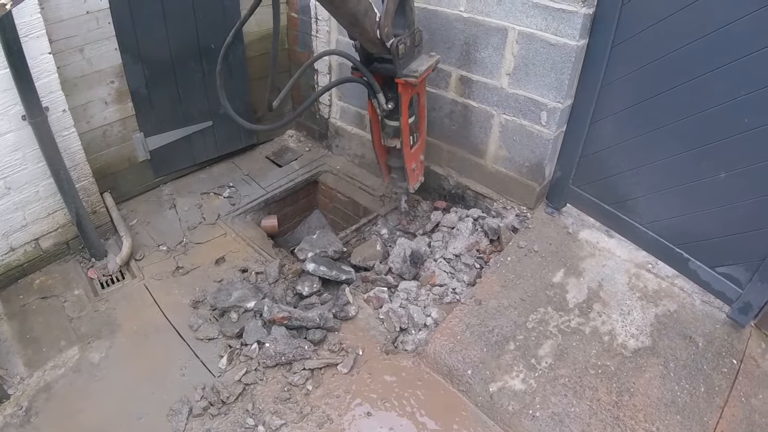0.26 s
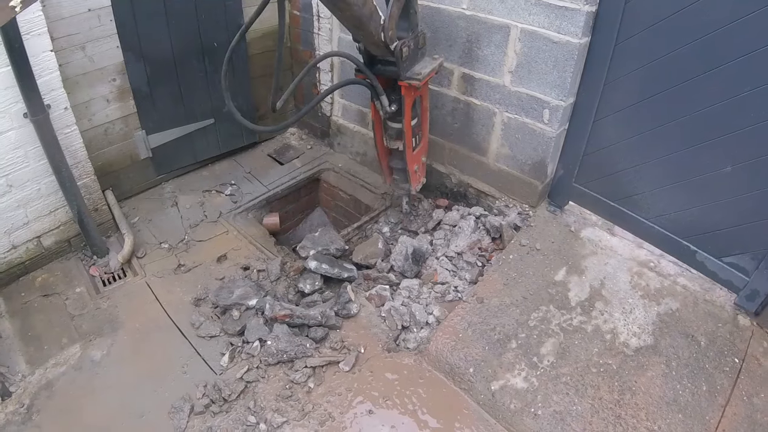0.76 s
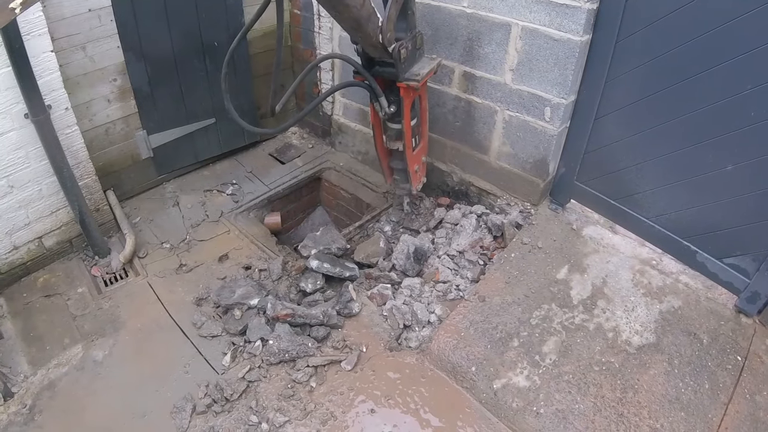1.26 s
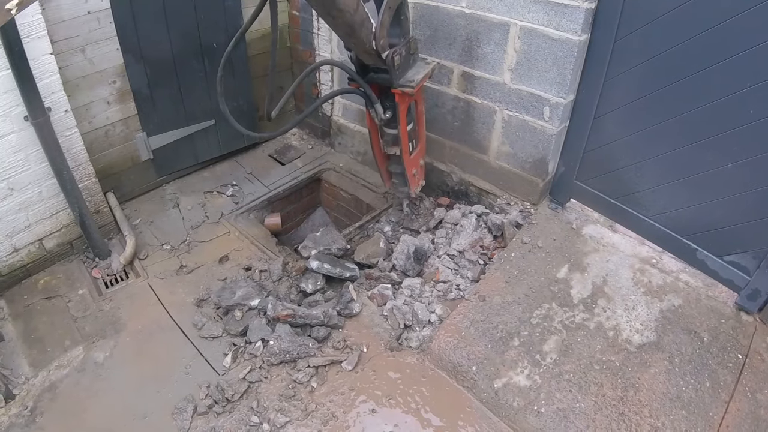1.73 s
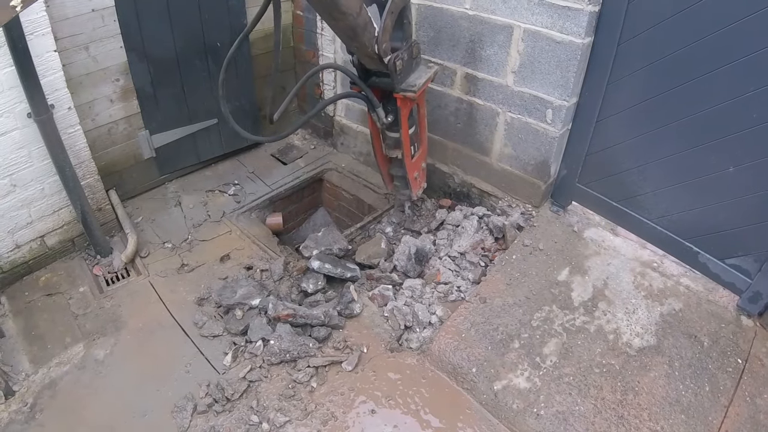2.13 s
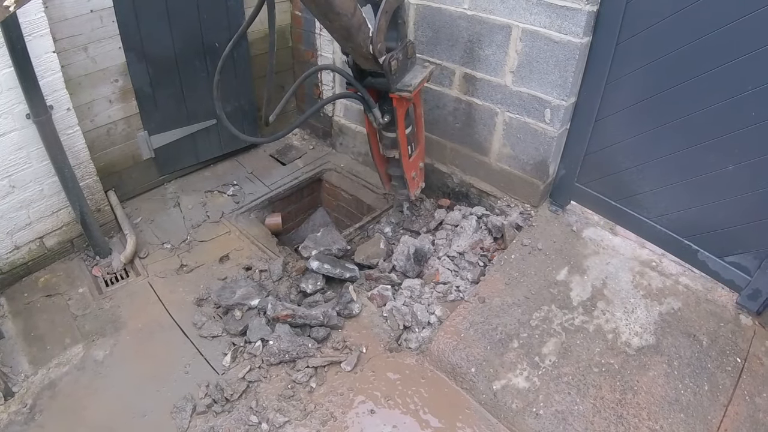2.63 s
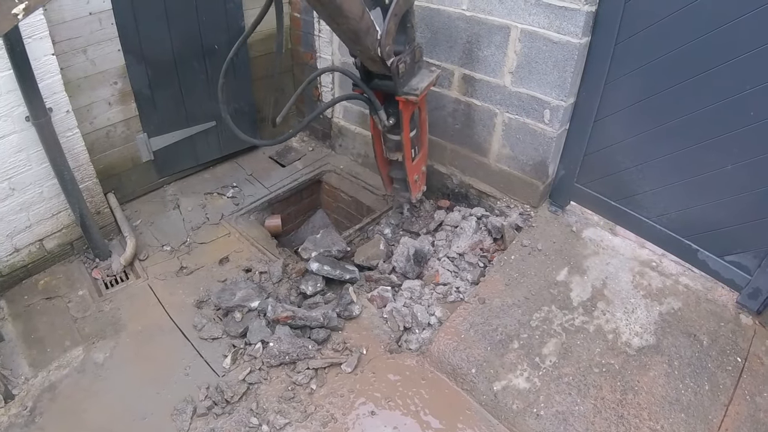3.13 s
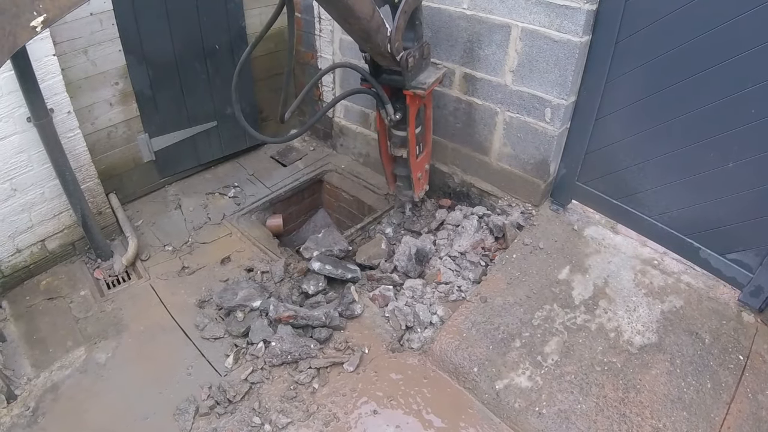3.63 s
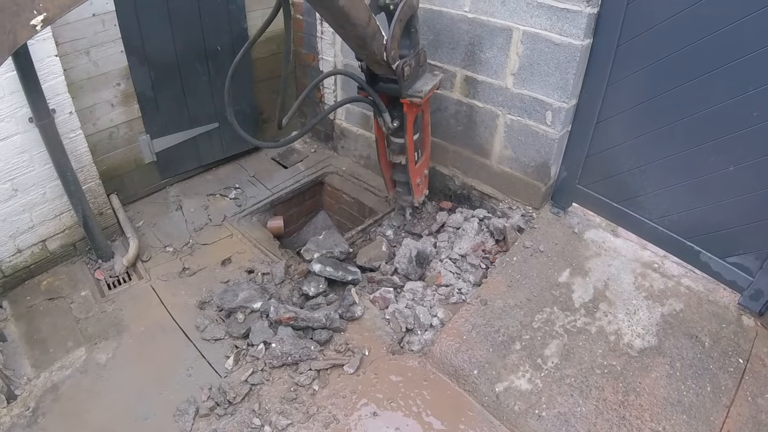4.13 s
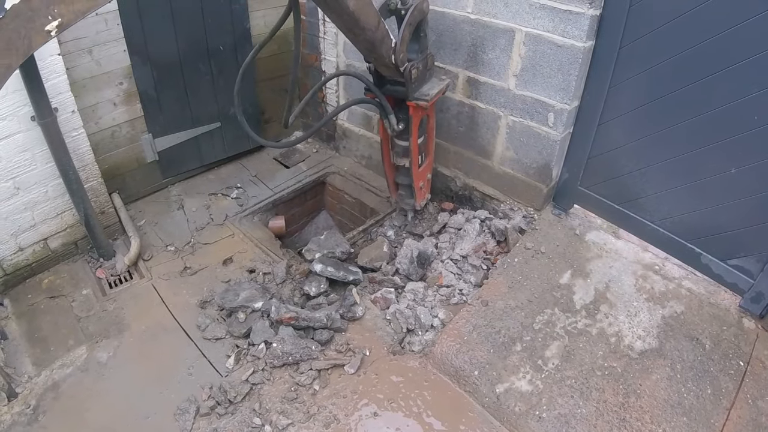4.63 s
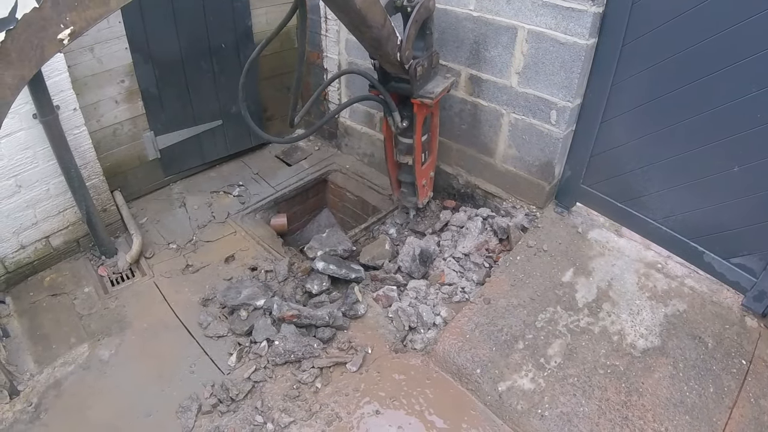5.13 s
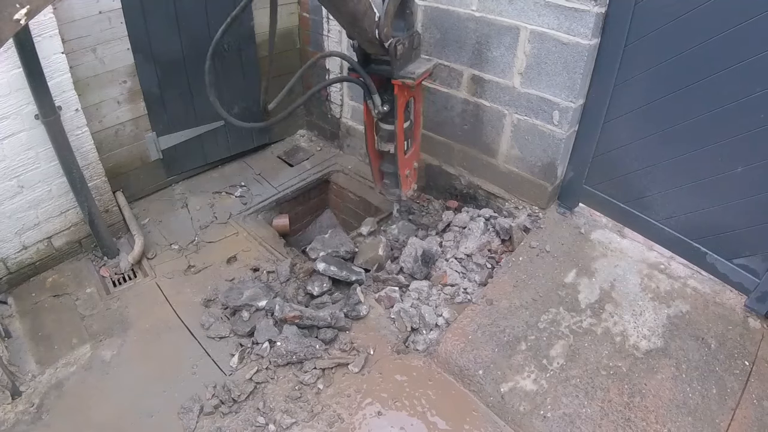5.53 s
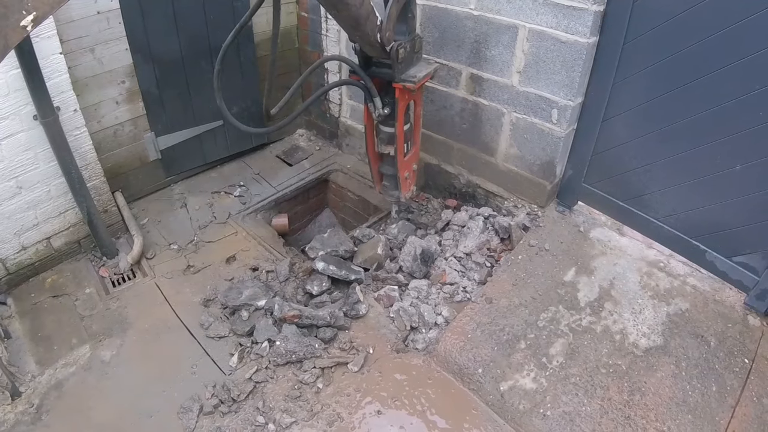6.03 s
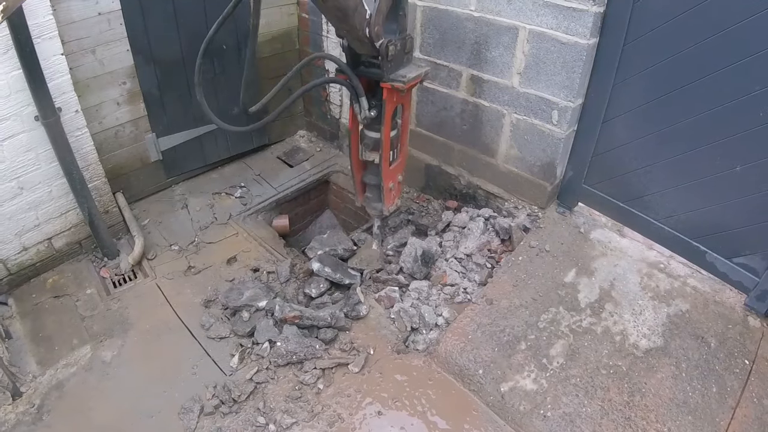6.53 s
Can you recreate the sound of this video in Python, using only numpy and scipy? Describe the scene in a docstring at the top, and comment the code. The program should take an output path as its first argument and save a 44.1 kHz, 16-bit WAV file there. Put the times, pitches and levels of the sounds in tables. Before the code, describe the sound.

A hydraulic breaker on a small digger hammers concrete in a fast stream of sharp cracks, with ringing steel and dull thuds. It falters briefly midway, resumes, then stops after about five seconds. A valve gives a faint, thin squeal, and the diesel engine comes up louder while the chisel knocks and scrapes a few times. The sound is close and bright, with short echoes from the walls of a yard.

```python
"""In a walled yard, a hydraulic breaker on a small digger hammers concrete.
Each piston blow cracks the slab, thuds in the ground and rings the steel chisel and its casing.
The digger rocks on its tracks; stray chisel blows and short scrapes add grit, clanks and low thuds.
The diesel engine runs throughout and is heard louder once the hammering stops and a valve squeals.
The walls echo the blows and scrapes, and the housing of a nearby camera colours the treble."""
import sys
import numpy as np
from scipy import signal
from scipy.fft import rfft, irfft, next_fast_len
from scipy.io import wavfile
from scipy.ndimage import uniform_filter1d, map_coordinates

SR = 44100
rng = np.random.default_rng(int(sys.argv[2]) if len(sys.argv) > 2 else 0)


def waveform_to_disk(signal):
    """Save audio, clipped to [-1, 1], as 16-bit WAV at the path in sys.argv[1]."""
    frames = np.transpose(np.atleast_2d(signal))
    scaled = np.clip(frames, -1, 1) * 32767
    samples = np.round(scaled).astype(np.int16)
    wavfile.write(sys.argv[1], SR, samples)


N = 299439


def amp(db):
    return 10 ** (np.asarray(db) / 20)


def unit(x):
    return x / np.sqrt(np.mean(x ** 2) + 1e-20)


def along(points, hz):
    """Reads a curve of (Hz, value) points on a log frequency axis."""
    f, v = np.transpose(points)
    return np.interp(np.log(hz + 1), np.log(f + 1), v)


def wobble(rate):
    """A smooth random curve through `rate` points a second."""
    return map_coordinates(rng.standard_normal(int(N * rate / SR) + 4), [np.arange(N) * rate / SR])


def filtered(x, response):
    """Scales each frequency in x by response(hz)."""
    size = next_fast_len(N + SR // 2)
    return irfft(rfft(x, size) * response(np.fft.rfftfreq(size, 1 / SR)), size)[..., :N]


def noise(colour):
    """Steady noise with the given balance of low and high."""
    return unit(filtered(rng.standard_normal(N), lambda hz: amp(along(colour, hz))))


def placed(times, rows):
    """Adds each row of samples at its start time, which may be up to a second early."""
    at = np.round((np.asarray(times) + 1) * SR).astype(int)[:, None] + np.arange(rows.shape[1])
    return np.bincount(at.ravel(), rows.ravel(), SR + N)[SR:SR + N]


def drifting(count, size, alike):
    """Random numbers, one row per blow; each row resembles the one before."""
    fresh = rng.standard_normal((count + 20, size))
    return signal.lfilter([np.sqrt(1 - alike ** 2)], [1, -alike], fresh, axis=0)[20:]


def bursts(colour, count, size, alike):
    """Noise, one row per blow: the same steel on the same spot sounds nearly the same."""
    gains = amp(along(colour, np.fft.rfftfreq(size, 1 / SR)))
    return unit(irfft(rfft(drifting(count, size, alike)) * gains, size))


def ringing(notes, count, t, scatter_db, detune, turn, attack_s):
    """Fading notes, one row per blow: level, pitch and phase drift as the contact changes."""
    rows = np.zeros((count, len(t)))
    for hz, db, fade_s in notes:
        level, pitch, phase = drifting(count, size=3, alike=0.56).T[:, :, None]
        cycles = hz * (1 + detune * pitch) * t + turn * phase
        rows += amp(db + scatter_db * level - 60 * t / fade_s) * np.sin(2 * np.pi * cycles)
    return rows * (1 - np.exp(-t / attack_s))


def snap(t):
    """The loudness of one impact: a sharp rise and a quick fade."""
    t = t.clip(0)
    return amp(-60 * t / 0.054) * (1 - np.exp(-(t / 0.00082) ** 2))


# The noise of cracking concrete, then of loose chips. Each row: frequency in Hz, relative level in dB.
CRACK_COLOUR = [(1500, -14), (3000, -5.5), (5000, 7), (8000, 1.5), (13000, 2)]
CHIP_COLOUR = [(1500, -18), (2200, -22), (2750, -19), (3600, -2), (4400, 0.5), (5200, 2), (8000, -1),
               (10000, -9), (13000, -20)]

def concrete_crack(t, db, lag_s, rattle):
    """The piston lands with a steel tick, the concrete gives way just after, and chips chatter on."""
    impact = amp(-2) * snap(t) + snap(t - lag_s + 0.00083)
    tick_db = -7 + 4.4 * rng.standard_normal(db.shape)
    tick = amp(tick_db - 60 * (t - .001).clip(0) / .006) * (t > .001)
    crack = amp(db - 8) * (impact + tick) * bursts(CRACK_COLOUR, len(db), len(t), alike=0.85)
    chips = amp(db - 9) * rattle * bursts(CHIP_COLOUR, len(db), len(t), alike=0.3)
    return crack + chips


# The noise of a clank. Each row: frequency in Hz, relative level in dB.
CLANK_COLOUR = [(400, -14), (800, -0.5), (1400, 2.5), (2200, -0.5), (3200, -1), (5000, -16.5)]
# The casing's notes. Each row: pitch in Hz, relative level in dB, seconds to fade by 60 dB.
CASING_NOTES = [(1321, -5, 0.19), (1618, -8, 0.079), (2030, -3, 0.17), (2510, 4, 0.063), (2930, -2, 0.2),
                (3437, 1, 0.22), (3760, 6.5, 0.1), (3874, 9, 0.094), (4732, 2, .1)]

def casing_clank(t, clank_db, ring_db, rattle):
    """The steel casing clanks with the blow and the rattle, then rings on."""
    count = len(clank_db)
    clank = (snap(t) + amp(3) * rattle) * bursts(CLANK_COLOUR, count, len(t), alike=.9)
    ring = ringing(CASING_NOTES, count, t, scatter_db=1.5, detune=0.0047, turn=0.22, attack_s=0.0047)
    return amp(clank_db) * clank + amp(ring_db) * ring


# The chisel's notes, main one first. Each row: pitch in Hz, relative level in dB, seconds to fade 60 dB.
CHISEL_NOTES = [(6612, 20, 0.097), (4520, -27, 0.034), (4900, -6.5, 0.064), (5100, -25, 0.034),
                (5030, -2, 0.057), (5140, 1, .08), (5350, -16, 0.033), (5770, -29, 0.043),
                (6870, -30, 0.11), (6900, 1, 0.14), (6760, -41, 0.071), (7400, -33, 0.14),
                (8150, 11, 0.082), (7730, -14, 0.074), (8590, 7, 0.072), (8750, 5, 0.088)]

def chisel_ring(t, main_db, others_db, lag_s):
    """The chisel's main note builds until the crack; rubbing on stone roughens all its notes."""
    count = len(main_db)
    others = ringing(CHISEL_NOTES[1:], count, t, scatter_db=1, detune=.01495, turn=.23, attack_s=.0018)
    main = ringing(CHISEL_NOTES[:1], count, t, scatter_db=1.4, detune=.0023, turn=.12, attack_s=.00071)
    swell = 1 - np.exp(-(t / (lag_s + 0.00017)) ** 2)
    rubbing_db = 3 * unit(uniform_filter1d(rng.standard_normal(main.shape), 90, axis=1))
    return (amp(others_db) * others + amp(main_db) * swell * main) * amp(rubbing_db)


# Notes of the slab, then the digger's arm. Each row: pitch in Hz, relative dB, seconds to fade 60 dB.
SLAB_NOTES = [(230.7, 2.5, 0.031), (284, -9.5, 0.096), (342.4, -10, 0.12), (448, -3.5, 0.03),
              (542, -8.5, 0.11)]
ARM_NOTES = [(147, 1.5, 0.14), (226, -10, 0.22), (265.6, -4, 0.21), (453.4, -8.5, 0.25), (597, -4, .06),
             (735, 3, 0.055), (868.5, -8, 0.57), (1016, -4.5, 0.14), (1191, 7.5, 0.043), (2567, -3.5, 0.11),
             (3030, 1, 0.067)]

def ground_thud(t, db, slab_db, arm_db, jolt_hz=350, jolt_s=0.0011):
    """The slab jolts down and up, then it and the digger's arm ring."""
    jolt = np.sin(2 * np.pi * jolt_hz * (t - .0022)) * np.exp(-((t - .0024) / jolt_s) ** 2)
    slab = ringing(SLAB_NOTES, len(db), t, scatter_db=2, detune=0.031, turn=0.11, attack_s=0.005)
    arm = ringing(ARM_NOTES, len(db), t, scatter_db=1, detune=.004, turn=.03, attack_s=.001)
    return amp(db) * (jolt + amp(slab_db) * slab + amp(arm_db) * arm)


# The piston's blows. Each row: start in seconds, strength in dB.
PISTON_BLOWS = [(-.0085, -13.5), (0.0365, -12), (0.0816, -12), (.128, -12.5), (0.1741, -11.5),
                (0.2184, -11.5), (0.2634, -12.5), (.308, -13), (.3534, -12.5), (0.398, -12),
                (0.4424, -12.5), (.487, -11), (0.5314, -13), (0.5759, -11.5), (0.622, -11), (0.666, -11.5),
                (0.7105, -12.5), (0.756, -12.5), (0.8013, -12), (0.8456, -10.5), (0.8903, -11),
                (.9367, -12.5), (0.987, -8.5), (1.0398, -7.5), (1.0931, -8.5), (1.146, -7.5), (1.203, -8),
                (1.2614, -8), (1.3186, -7.5), (1.3752, -8), (1.4329, -7.5), (1.491, -9.5), (1.548, -9.5),
                (1.5987, -10.5), (1.6466, -11.5), (1.6946, -11), (1.7433, -10.5), (1.797, -8.5),
                (1.861, -8.5), (1.9288, -9.5), (1.988, -12.5), (2.0429, -11), (2.097, -11), (2.1487, -9.5),
                (2.2004, -8.5), (2.255, -8), (2.3144, -9), (2.3719, -8.5), (2.4271, -7.5), (2.4846, -9),
                (2.5445, -8), (2.607, -10), (2.6704, -11.5), (2.7345, -13.5), (2.7975, -15),
                (2.8604, -15.5), (2.9245, -18.5), (2.9989, -30), (3.0738, -15), (3.1419, -23.5),
                (3.2081, -14), (3.2902, -11.5), (3.3616, -9), (3.423, -9), (3.4808, -9.5), (3.5361, -11.5),
                (3.6005, -13), (3.6656, -9.5), (3.7215, -8), (3.7732, -10), (3.821, -8), (3.8693, -12.5),
                (3.9185, -12), (3.9669, -11.5), (4.02, -9), (4.0811, -7.5), (4.1422, -7.5), (4.1971, -6.5),
                (4.2464, -8), (4.2967, -6.5), (4.3466, -7), (4.3956, -8), (4.448, -12.5), (4.5052, -10.5),
                (4.5633, -9), (4.6174, -9), (4.6679, -9), (4.7158, -8.5), (4.7643, -8), (4.813, -8),
                (4.863, -7.5), (4.918, -7.5), (4.977, -10.5), (5.0737, -24.5), (5.2207, -26.5),
                (5.2701, -44)]
# How the chisel sits in the slab. Each row: time in seconds, looseness from 0 (tight) to 1 (loose),
# then relative levels in dB for the ground thud, casing clank, chisel ring and casing ring.
CHISEL_SEATING = [(0, 0.86, -17.5, -29, -39, -12), (.56, 0.84, -17, -28, -42, -15),
                  (.75, 0.97, -20.5, -29.5, -24, 3), (.93, 0.62, -14.5, -30, -37, 4.5),
                  (1.0, 0.13, -17, -28.5, -24, -2), (1.45, 0.22, -14.5, -29, -37, 0.5),
                  (1.65, 0.15, -16, -26, -17.5, -3.5), (1.862, 0.04, -18, -27, -33, -1.5),
                  (2.15, 0.06, -18, -25.5, -19, -4), (2.48, 0.32, -14.5, -29.5, -38, 1.5),
                  (2.62, 0.16, -17.5, -31, -14.5, -4), (2.95, 0.69, -21, -31, -10, -1),
                  (3.148, 0.27, -20, -26, -17, 5), (3.3, 0.2, -13, -26, -23, -7),
                  (3.9, 0.46, -11, -27, -31, -0.5), (4.08, 0.23, -16.5, -26.5, -30, -3.5),
                  (4.5, 0.23, -16, -26.5, -29.5, -8), (4.87, 0.3, -21, -30.5, -22, -6.5),
                  (5.3, 0.25, -42, -41, -39, 8.5)]

def breaker(usual_blow_db=-11):
    """A piston hits the chisel; the force and the chisel's seating shape each blow."""
    starts, db = np.transpose(PISTON_BLOWS)[:, :, None]
    times, *columns = np.transpose(CHISEL_SEATING)
    loose, thud_db, clank_db, chisel_db, casing_db = (np.interp(starts, times, c) for c in columns)

    def tight_to_loose(tight_value, loose_value):
        return np.interp(loose, [0, 1], [tight_value, loose_value])

    t = np.arange(4608) / SR
    force_db = db - usual_blow_db
    # the wait between the piston landing and the concrete giving way
    lag_s = tight_to_loose(0.0047, 0.00063) * np.exp(0.31 * rng.standard_normal(starts.shape))
    # a loose chisel rattles louder and longer
    rattle_db, rattle_s = tight_to_loose(-8.5, 2), tight_to_loose(.12, .17)
    rattle = amp(rattle_db - 60 * t / rattle_s) * (1 - np.exp(-t / 0.0039))
    crack = concrete_crack(t, db, lag_s, rattle)
    casing = casing_clank(t, clank_db + 0.23 * force_db, casing_db + force_db - 36, rattle)
    chisel = chisel_ring(t, chisel_db + force_db - 25, db - 23.5, lag_s)
    thud = ground_thud(t, thud_db + 0.13 * force_db - 2.5,
                       slab_db=tight_to_loose(-5.5, -3), arm_db=tight_to_loose(-38.5, -5))
    fade_out = 1 - (t / t[-1]) ** 8
    return placed(starts[:, 0] - .001, (crack + casing + chisel + thud) * fade_out)


# The engine as it is heard, louder once the hammering stops.
# Each row: time in seconds, firings a second, exhaust level in dB, hum level in dB.
ENGINE_AS_HEARD = [(0, 55.8, -40, -50), (.8, 56.7, -39.5, -42), (1.1, 56.4, -42, -43),
                   (2.5, 56.8, -42.5, -46), (3.05, 55.5, -42, -39.5), (3.3, 57, -40.5, -41.5),
                   (4, 56.5, -40, -39.5), (4.6, 56.75, -43, -42), (5.05, 56, -44.5, -42.5),
                   (5.3, 55.2, -39, -36), (5.46, 54.64, -35.5, -35), (5.6, 59.75, -37.5, -37),
                   (5.901, 57.4, -35, -32), (6.33, 58, -32.5, -30), (6.6, 58.04, -30, -29),
                   (6.79, 57.7, -32.5, -30)]
# The hum of engine and pump. Each row: multiple of the firing rate, relative level in dB.
HUM_TONES = [(1, -2.5), (2, -2.5), (2.93, -10.5), (3.55, -21), (4, -3), (4.58, -7), (5, -19.5), (6.33, -19),
             (8, -22)]
# The noise of the exhaust, then of the valves. Each row: frequency in Hz, relative level in dB.
EXHAUST_COLOUR = [(20, -16), (36, -11), (60, -19), (85, -15), (140, -4), (230, 1.5), (400, -7), (800, -9),
                  (1500, -15.5), (3000, -24), (6000, -103)]
CLATTER_COLOUR = [(300, 3), (700, 0.5), (1500, 1.5), (3000, -8.5), (6000, -4), (9500, -11), (13000, -60)]

def diesel_engine():
    """The firings make a hum and put a beat into the exhaust roar and the valve clatter."""
    times, *columns = np.transpose(ENGINE_AS_HEARD)
    t = np.arange(N) / SR
    firing_hz, exhaust_db, hum_db = (np.interp(t, times, c) for c in columns)
    firings = np.cumsum(firing_hz) / SR
    hum = np.zeros(N)
    for multiple, db in HUM_TONES:
        level = amp(db + 0.61 * multiple * wobble(8.7))
        cycles = multiple * (firings + 0.0096 * wobble(12)) + rng.random()
        hum += level * np.sin(2 * np.pi * cycles)
    uneven = np.where(firings % 2 < 1, 1, .7)  # the cylinders differ
    beat = uneven * np.exp(-(firings % 1) / 0.33)
    roar = unit((1.8 + beat) * noise(EXHAUST_COLOUR)) * amp(exhaust_db + 0.9 * wobble(8))
    clatter_db = -47 + 0.67 * (exhaust_db + 40)  # follows the exhaust level
    clatter = unit((4.7 + beat) * noise(CLATTER_COLOUR)) * amp(clatter_db + 0.4 * wobble(5))
    return amp(hum_db) * hum + roar + clatter


# The digger's thumps. Each row: start in seconds, level in dB.
TRACK_THUMPS = [(.85, -33), (.9, -36), (2.33, -43), (3.19, -36), (4.82, -43)]

def digger_rocking(hz=42, rise_s=.008, fade_s=.2):
    """The digger rocks on its tracks with low, soft thumps."""
    starts, db = np.transpose(TRACK_THUMPS)[:, :, None]
    t = np.arange(SR // 4) / SR
    shape = amp(db - 60 * t / fade_s) * (1 - np.exp(-t / rise_s))
    return placed(starts[:, 0], shape * np.sin(2 * np.pi * hz * t))


# Stray chisel blows and short scrapes. Each row: start in seconds, level in dB, dB added for its clank.
STRAY_BLOWS_AND_SCRAPES = [(3.171, -13, -14), (3.2174, -4, -18), (3.296, -9, -14), (5.362, -25, -9),
                           (5.378, -21.5, -13.5), (5.4017, -20.5, -12), (5.456, -18, -9),
                           (5.479, -8.5, -11), (5.708, -29, -8), (5.934, -17, -13.5), (6.3205, -24, -18),
                           (6.57, -26, -10), (6.607, -26.5, 0), (6.649, -11, -6), (6.6704, -17, -9),
                           (6.6877, -8, -15), (6.707, -14, -7.5)]
# Their low thud. Each row: frequency in Hz, relative level in dB.
THUD_COLOUR = [(40, -14), (90, -13), (150, 2), (260, -3), (500, -0.5), (900, -16), (2000, -48)]

def stray_blows_and_scrapes(rise_s=0.006, fade_s=0.017, grit_db=-12.5, thud_db=-16):
    """The chisel strikes or scrapes briefly, each time with grit, a clank and a low thud."""
    starts, db, clank_db = np.transpose(STRAY_BLOWS_AND_SCRAPES)[:, :, None]
    t = np.arange(SR // 8) / SR
    shape = amp(db) * (1 - np.exp(-t / rise_s)) * np.exp(-t / fade_s)
    layers = [(grit_db, CHIP_COLOUR), (clank_db, CLANK_COLOUR), (thud_db, THUD_COLOUR)]
    roughness = amp(1.93 * wobble(300))
    return roughness * sum(placed(starts[:, 0] - .002, amp(layer_db) * shape) * noise(colour)
                           for layer_db, colour in layers)


# The valve's whistle. Each row: time in seconds, pitch in Hz, level in dB.
VALVE_WHISTLE = [(5.07, 2900, -72), (5.11, 2930, -51), (5.21, 3150, -58), (5.251, 3250, -72)]

def valve_squeal():
    """Pressure bleeds off through a valve: a thin rising whistle with its octave."""
    times, hz, db = np.transpose(VALVE_WHISTLE)
    t = np.arange(N) / SR
    phase = 2 * np.pi * np.cumsum(np.interp(t, times, hz) + 8 * wobble(60)) / SR
    level = amp(np.interp(t, times, db, left=-120, right=-120) + 2 * wobble(40))
    return level * (np.sin(phase) + .6 * np.sin(2 * phase))


# Echoes off the walls. Each row: delay in seconds, level in dB.
WALL_ECHOES = [(.008, -23), (.013, -22.5), (.019, -22), (0.029, -27)]

def yard(x, tail_db=-14.5, tail_s=0.04):
    """Near walls send back a few echoes and a short, blurred tail."""
    t = np.arange(SR // 4) / SR
    tail = amp(-60 * t / tail_s) * rng.standard_normal(len(t))
    response = amp(tail_db) * unit(tail) / np.sqrt(len(t))
    response[0] = 1  # the direct sound
    for delay_s, db in WALL_ECHOES:
        response[round(delay_s * SR)] += amp(db)
    return signal.fftconvolve(x, response)[:N]


def scene():
    """All the sounds in one channel; only the blows and scrapes echo."""
    hammering = yard(breaker() + stray_blows_and_scrapes())
    return (hammering + diesel_engine() + digger_rocking() + valve_squeal())[None]


# How the camera housing colours the treble. Each row: frequency in Hz, boost or cut in dB.
HOUSING_COLOUR = [(3000, -2), (3800, -3), (4250, -8.5), (5200, 4.5), (5850, -1), (6600, 10), (7300, -0.5),
                  (8200, 0), (9400, -1), (10300, -16.5), (11400, -10.5), (12300, -26), (13300, -59)]

def record(dry, ceiling=.62, top_hz=13345):
    """The housing rings in the treble, loud peaks are rounded off and the highest treble is cut."""
    cepstrum = irfft(np.log(amp(along(HOUSING_COLOUR, np.fft.rfftfreq(2048, 1 / SR)))))
    # folding the second half onto the first makes the ringing follow a sound, never lead it
    cepstrum[1:1024] *= 2
    cepstrum[1025:] = 0
    housing_ring = irfft(np.exp(rfft(cepstrum)))
    housed = signal.fftconvolve(dry, housing_ring[None], axes=1)[:, :N]
    rounded = housed / (1 + np.abs(housed / ceiling) ** 4) ** (1 / 4)
    return filtered(rounded, lambda hz: amp(-700 * ((hz / top_hz).clip(.85, 1) - .85) ** 2)
                    * (hz < top_hz))


dry = scene()
out = record(dry)
waveform_to_disk(out)
```